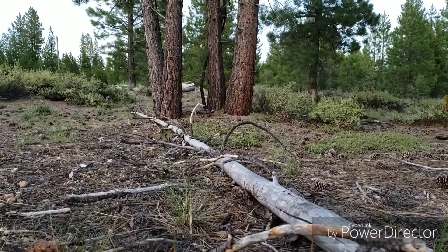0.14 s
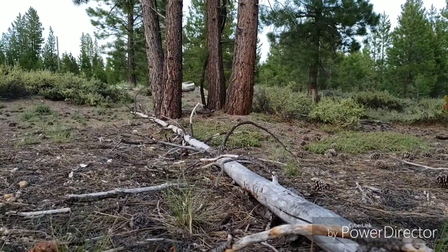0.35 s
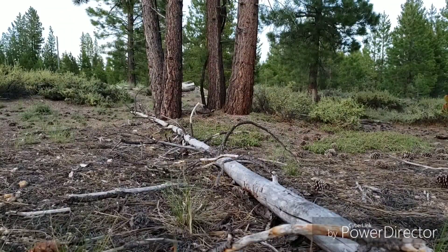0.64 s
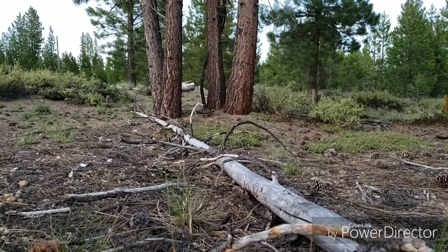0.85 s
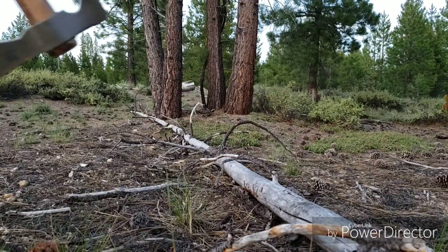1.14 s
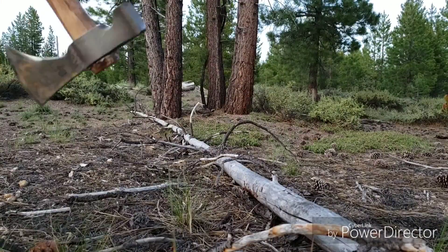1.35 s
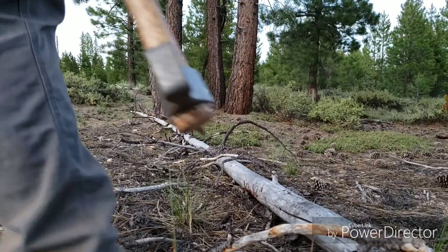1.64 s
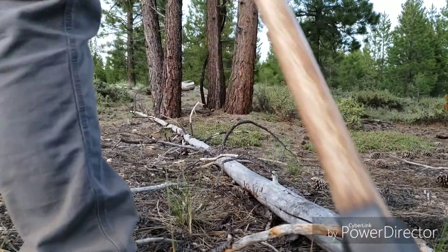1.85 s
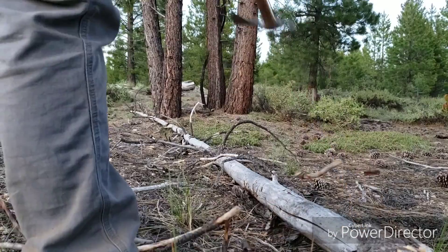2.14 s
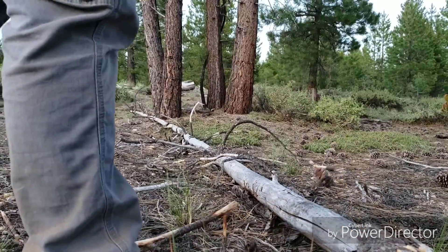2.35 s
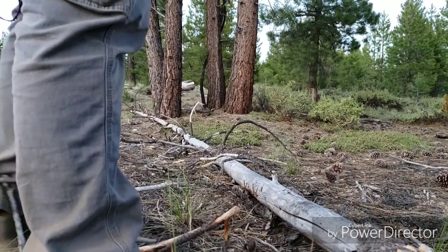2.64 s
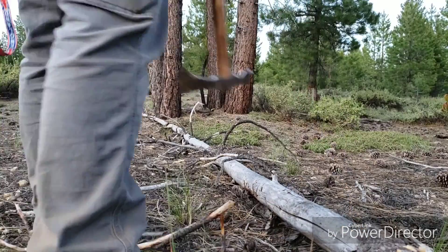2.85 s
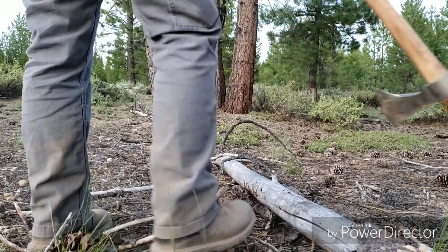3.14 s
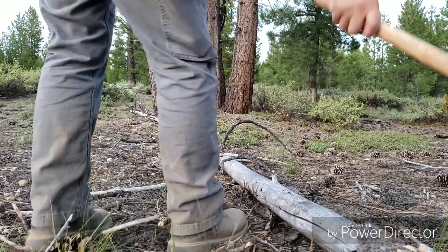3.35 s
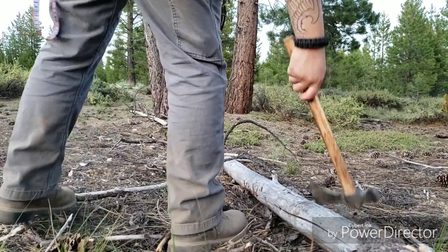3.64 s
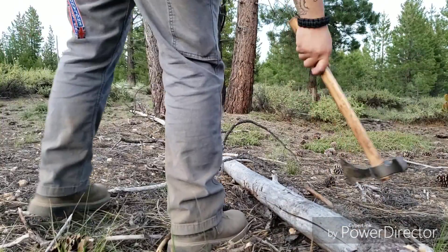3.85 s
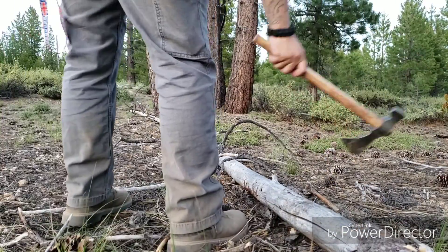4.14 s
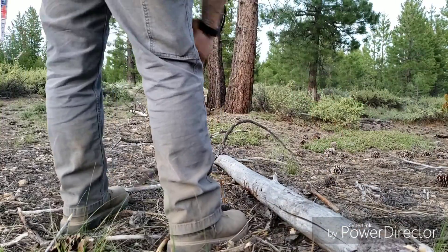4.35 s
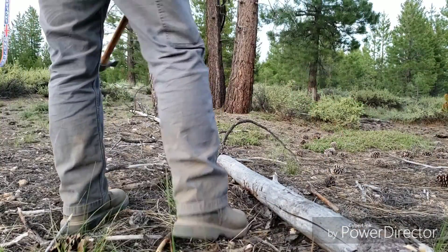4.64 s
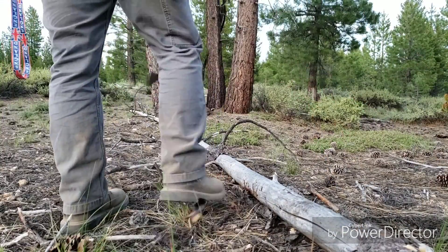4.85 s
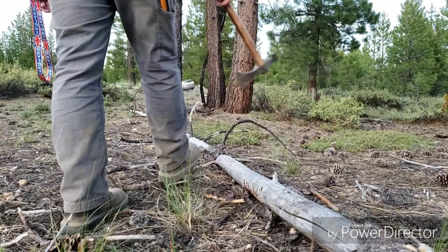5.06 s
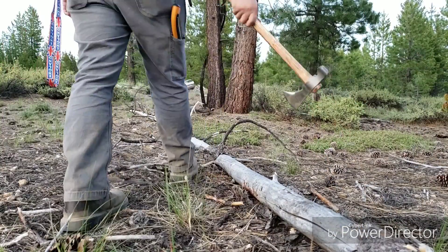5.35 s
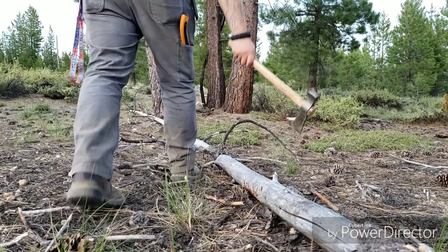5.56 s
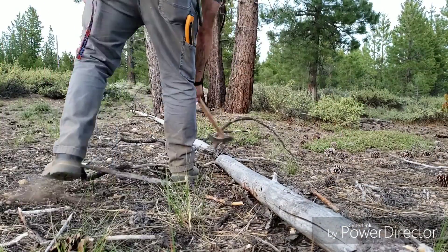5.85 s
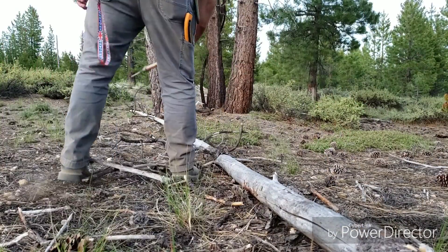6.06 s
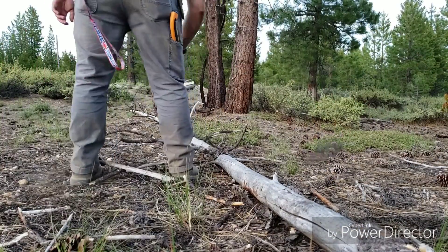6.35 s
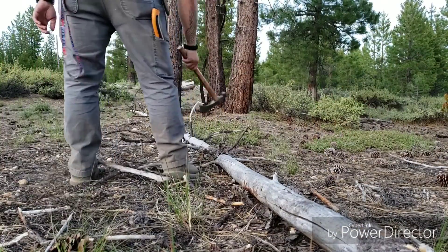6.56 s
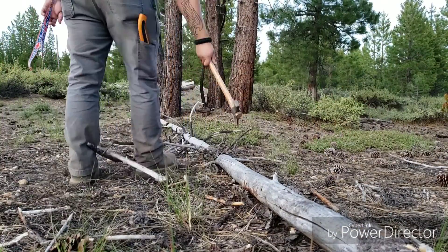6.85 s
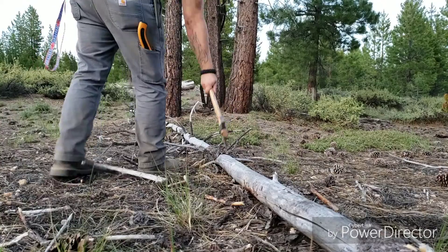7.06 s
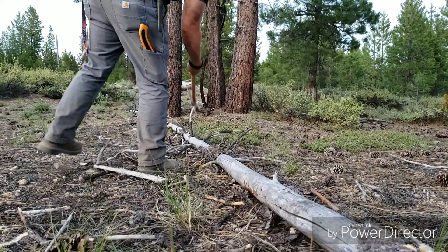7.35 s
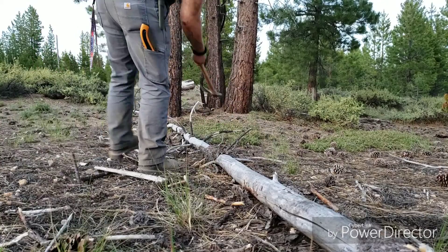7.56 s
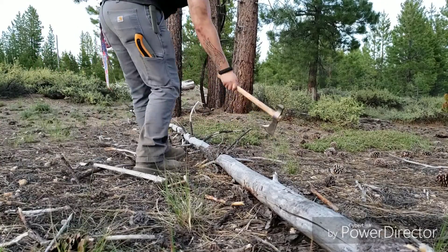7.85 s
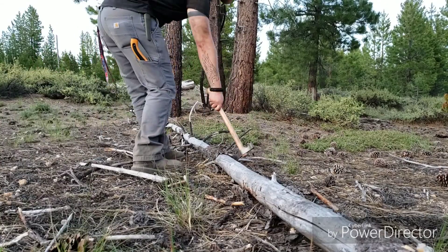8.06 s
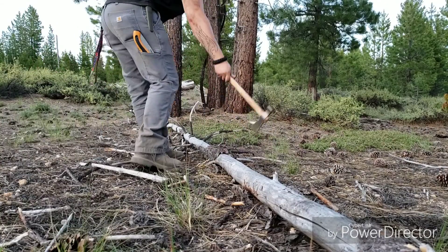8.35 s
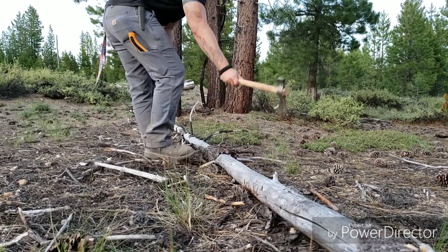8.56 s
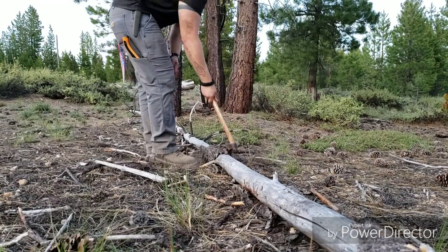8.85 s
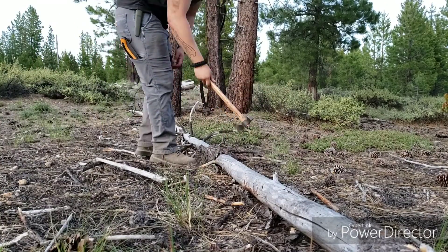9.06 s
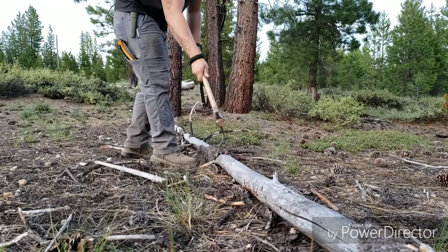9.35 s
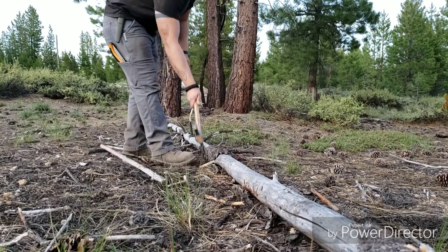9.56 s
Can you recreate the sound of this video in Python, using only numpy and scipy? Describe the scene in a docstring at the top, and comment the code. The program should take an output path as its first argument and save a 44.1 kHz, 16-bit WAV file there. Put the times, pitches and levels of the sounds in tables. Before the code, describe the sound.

Boots crunch through dry forest litter close on the left, then a hatchet chops a dead log in sharp, woody blows among snapping twigs.

```python
"""Boots crunch in dry forest litter first, close on the left of a phone's two microphone ports.
Then a hatchet trims a dead log: each blow is tearing noise, a thump through the log's resonances and
a ringing steel head, with chips pattering. Twigs snap as short noise bursts, dropped wood thuds as damped
sines, one squeak slides upward. Trunks return a faint tail of blows and snaps; gusts rumble on the ports."""
import sys
import numpy as np
from scipy import signal
from scipy.fft import rfft, irfft, next_fast_len
from scipy.io import wavfile
from scipy.ndimage import map_coordinates

SR = 44100
rng = np.random.default_rng(int(sys.argv[2]) if len(sys.argv) > 2 else 0)


def generate_wav(signal):
    """Clip the signal to [-1, 1] and save it as 16-bit WAV at the path in sys.argv[1]."""
    frames = np.transpose(np.atleast_2d(signal))
    scaled = np.clip(frames, -1, 1) * 32767
    pcm = np.round(scaled).astype(np.int16)
    wavfile.write(sys.argv[1], SR, pcm)


N = 427769  # samples
LEAD = 64  # samples of silence ahead of each short sound

# Steel head of the hatchet. Each row: pitch in Hz, level in dB on top of the blow's ring, 60 dB decay in s.
STEEL_MODES = [(5400, -4, .07), (6160, -2, .14), (12130, -5, .32)]
# Splitting wood at the ports. Each row: frequency in Hz, relative density in dB.
CRACK_SPECTRUM = [(710, -34), (1200, -15.5), (2220, -26), (4330, -14), (4780, -11), (6360, -7.5),
                  (7570, -19), (11000, -2.5), (14600, -9), (16500, -39.5)]
# Hatchet blows. Each row: strike in seconds, crack level in dB before a 5 dB trim, thump peak in dB,
# ground boom in dB relative to the thump, splintering in s, chips in dB relative to the crack,
# low ring in dB, high ring in dB, brushing ahead of the strike in s.
BLOWS = [(2.115, -9.5, -36.5, -19.5, 0.0049, -19, -50, -45, 0.0056),
         (3.6574, -7.5, -10, -20.5, 0.0053, -27, -48.5, -28.5, .018),
         (4.376, -12.5, -30, -11, 0.0055, -28.5, -54.5, -40, 0),
         (5.958, -8.5, -15.5, -21.5, 0.0051, -11.5, -25.5, -40.5, 0),
         (7.309, -6.5, -18.5, -30, 0.005, -25.5, -43.5, -46, 0.0001),
         (8.192, -25, -12.5, -16, 0.0044, -10, -51, -47, .01),
         (8.852, -10.5, -3, -29.5, 0.0053, -14.5, -51.5, -56, 0)]


def blows():
    """The edge tears fibres for some ms, thumps log and ground and rings the head; chips patter down."""
    out, t = np.zeros((2, N + SR)), np.arange(SR // 2) / SR
    patter = grit(count=600, spread_db=5, bed=1)
    for s, crack_db, thump_db, boom_db, tear_s, chips_db, low_db, high_db, brush_s in BLOWS:
        late = np.maximum(t - tear_s, 0)
        chips = amp(chips_db) * fade(late, .22) * np.resize(patter[round(s * SR):], len(t))
        opening = np.minimum(.3 + .7 * (t / tear_s) ** 2, 1)
        tearing = opening * (fade(late, .01) + chips)
        # thick wood splits duller than twigs: dB per octave
        fibres = filtered(noise(t), lambda hz: amp(-2.5 * np.log2(hz + 100)))
        crack = amp(crack_db - 5) * tearing * coloured(fibres, CRACK_SPECTRUM)

        impact = noise(t) * (fade(t, .028) + .16 * fade(t, .15))
        force = filtered(impact, lambda hz: 1 / (1 + 1j * hz / 1500))
        thump = filtered(force, wood)
        boom_shape = (1 - np.exp(-t / .0073)) * fade(t, .5)
        boom = amp(boom_db) * boom_shape * coloured(noise(t), RUMBLE_SPECTRUM)
        body = amp(thump_db) * (thump / np.abs(thump).max() + boom)

        ring = np.zeros(len(t))
        for (hz, mode_db, t60_s), struck_db in zip(STEEL_MODES, (low_db, high_db, high_db)):
            ring += amp(struck_db + mode_db) * fade(late, t60_s) * np.sin(2 * np.pi * hz * late)
        add(out, s, ports(lead(crack + body + ring), 3.07))

        # on its way down the head brushes through twigs and bark
        brush = amp(-33) * fade(t, .12) * (t < brush_s) * coloured(noise(t), CRACK_SPECTRUM)
        add(out, s - brush_s, ports(lead(brush), 2.2))
    return out[:, :N]


# The log's body. Each row: resonance in Hz, width in Hz, peak gain in dB.
LOG_MODES = [(76, 16, -15), (170, 38, -4), (259, 37, -3), (420, 100, -2.5), (600, 140, 0), (705, 650, -2.5),
             (1300, 1200, -19)]


def wood(hz):
    """Resonances of the log, each a band-pass peak with the sign alternating from mode to mode."""
    total = 0
    for k, (centre, width, db) in enumerate(LOG_MODES):
        damping = 1j * hz * width
        total = total + (-1) ** k * amp(db) * damping / (centre ** 2 - hz ** 2 + damping)
    return total


# The edge wrenched free. In order: start in seconds, length in s, first and last pitch in Hz before
# the wobble, level in dB before the wobble.
SQUEAK = (8.243, .04, 3900, 4500, -41)


def squeak():
    """Steel slips in the cut at a rising, unsteady rate, with a strong octave."""
    s, length, from_hz, to_hz, db = SQUEAK
    bend = ((np.arange(N) / SR - s) / length).clip(0, 1) ** 2
    rate_hz = (from_hz + (to_hz - from_hz) * bend) * (1 + .02 * wobble(400))
    phase = 2 * np.pi * np.cumsum(rate_hz) / SR
    tone = np.sin(phase) + .5 * np.sin(2 * phase)
    return ports(amp(db + 3 * wobble(300)) * np.sin(np.pi * bend) * tone, 3)


# Log and loose wood dropping back on the ground. Each row: start in seconds, envelope peak of the push
# in dB, pitch in Hz, loss in nepers per cycle.
THUDS = [(2.975, -28, 247, 3.4), (3.053, -34, 703, 0.48), (1.335, -36.5, 300, 2.1), (1.877, -28.5, 610, 3),
         (2.035, -32, 575, 3), (3.428, -28.5, 318, 7.8), (3.701, -7.5, 300, 6.4), (3.707, -12, 269, 2.9),
         (4.486, -32.5, 307, 7), (7.034, -47.5, 730, 0.3), (7.254, -50.5, 1185, .5),
         (8.446, -57, 613, 0.33), (8.905, -11.5, 308, 3.7), (8.985, -30, 487, 8.7),
         (8.99, -67.5, 602, .035), (9.672, -32.5, 353, 2.9)]


def thuds():
    """Wood lands as a damped sine: high loss leaves about one push, low loss rings for many cycles."""
    out, t = np.zeros((2, N + SR)), np.arange(SR // 3) / SR
    for s, db, hz, loss in THUDS:
        cycles = t * hz
        envelope = np.e * loss * cycles * np.exp(-loss * cycles)
        push = np.sin(2 * np.pi * cycles) * envelope
        add(out, s, ports(lead(amp(db) * (push + .12 * filtered(push, wood))), 16))
    return out[:, :N]


# Twigs snapping. Each row: snap in seconds, crack peak in dB before a 4 dB trim, knock in dB before
# a 0.5 dB trim and its own envelope.
SNAPS = [(0.7799, -28.5, -63), (0.7895, -32, -51), (2.145, -18, -40), (2.317, -27.5, -78),
         (2.3421, -24, -75), (2.384, -23.5, -70), (2.426, -25, -81), (2.7152, -12.5, -36),
         (2.899, -30.5, -62), (2.9424, -21, -48), (2.9683, -11.5, -46), (2.976, -12, -62),
         (3.022, -17, -57.5), (3.052, -22, -60), (3.2222, -17, -42.5), (3.276, -20, -50),
         (3.3111, 2.5, -36), (3.4288, -17.5, -33), (3.727, -24, -46), (4.4074, -11.5, -40),
         (4.4669, -15, -55), (4.4847, -14, -46.5), (4.911, -30.5, -66), (5.101, -26.5, -50),
         (5.56, -29, -47), (6.1556, -22.5, -75), (6.199, -28, -49), (6.22, -21, -67), (6.3894, -22.5, -82),
         (6.42, -38, -64), (6.5775, -19, -49), (6.7448, -26, -51.5), (6.8049, -13.5, -51),
         (6.8311, -21.5, -53), (6.8916, -4, -29), (6.93, -5.5, -32), (6.9497, -22.5, -47.5),
         (6.9819, -28, -48), (6.9926, -18, -48), (7.031, -17.5, -47), (7.0367, -16.5, -46.5),
         (7.1608, -11.5, -43.5), (7.9492, -37, -50), (7.9665, -20, -35), (8.233, -34.5, -56.5),
         (8.297, -26, -53.5), (8.353, -18.5, -59), (8.77, -20.5, -51.5), (8.788, -10.5, -36),
         (9.651, -20.5, -57), (9.6752, -14.5, -42)]


def snaps():
    """Each twig creaks up to a very short bright crack and gives a dull knock."""
    out, t = np.zeros((2, N + SR)), np.arange(SR // 8) / SR
    tilt_db, = curves(WALKER_PLACE)
    bend_s = .004  # creak before the break
    late = np.maximum(t - bend_s, 0)
    rise = amp(60 * (t - bend_s) / .003)
    shape = np.minimum(rise, fade(late, .011) + .06 * fade(late, .05))
    for s, crack_db, knock_db in SNAPS:
        thin_db = rng.normal(0, 2)  # thinner twigs snap brighter: dB per octave
        fibres = filtered(noise(t), lambda hz: amp(thin_db * np.log2((hz + 100) / 8000)))
        crack = shape * coloured(fibres, CRACK_SPECTRUM)
        crack = amp(crack_db - 4) * crack / np.abs(crack).max()
        knock_shape = t / .0027 * fade(t, .03)
        knock = amp(knock_db - .5) * knock_shape * coloured(noise(t), TREAD_SPECTRUM)
        add(out, s + .001 - bend_s, ports(lead(crack + knock), tilt_db[round(s * SR)]))
    return out[:, :N]


# Crackle as the ports colour it. Each row: frequency in Hz, relative density in dB.
CRACKLE_SPECTRUM = [(710, -51.5), (1200, -15.5), (2220, -32), (2890, -19.5), (3840, -16), (4940, -16),
                    (6290, -14.5), (7740, -30.5), (8830, -17.5), (11700, 0), (14800, -13.5), (16000, -26),
                    (16500, -62.5)]
# Tread on soft ground. Each row: frequency in Hz, relative density in dB.
TREAD_SPECTRUM = [(53, -27), (90, -14.5), (119, -7.5), (452, -9.5), (505, -11.5), (695, -13), (1070, -15.5),
                  (2500, -29), (3250, -43.5), (5500, -120)]
# Where the walker is. Each row: time in seconds, treble tilt toward the left port in dB.
WALKER_PLACE = [(0, 15.5), (.4, 18), (1.85, 16), (2.1, 8.5), (2.5, 6.5), (2.65, 14), (3.08, 12.5),
                (3.16, 6.5), (3.75, 2), (4.05, 11), (5.3, 14), (6, 3), (6.3, 11), (8.4, 4), (9.7, 7)]
# Footfalls, scuffs and jolts of the log. Each row: start in seconds, length in s, crunch level in dB,
# tread level in dB.
STIRS = [(0, 0.18, -43.5, -48.5), (.365, 0.86, -51, -63), (.76, 0.14, -39.5, -50), (.85, .15, -47, -49.5),
         (1.11, 0.2, -49, -60.5), (1.32, 0.12, -48, -51), (1.47, 0.056, -47, -56.5),
         (1.62, 0.12, -60.5, -71.5), (1.76, 0.099, -41.5, -50), (1.87, 0.17, -43, -47),
         (2.12, 0.028, -50.5, -60), (2.35, 0.013, -54, -70), (2.46, 0.0057, -51.5, -97),
         (2.61, 0.07, -53.5, -62), (2.77, 0.14, -47, -63), (2.97, 0.14, -47.5, -56.5),
         (3.24, 0.087, -44.5, -59), (3.32, 0.039, -42.5, -49.5), (3.43, 0.013, -46, -47.5),
         (3.55, 0.095, -61.5, -74), (3.67, 0.0097, -36.5, -36), (3.91, 0.0091, -57, -93),
         (4.07, 0.024, -63, -73), (4.39, 0.089, -50, -49.5), (4.68, 0.09, -62, -73),
         (4.94, 0.034, -50.5, -74.5), (5.11, 0.023, -57, -73.5), (5.28, 0.14, -63.5, -83),
         (5.43, 0.0075, -45, -64.5), (5.56, 0.012, -50, -58), (5.73, 0.0083, -56, -68.5),
         (5.905, 0.16, -55, -67), (6.2, 0.0073, -50, -52.5), (6.35, 0.11, -62, -64.5),
         (6.6, 0.92, -61, -71.5), (6.8, 0.11, -57, -58.5), (6.91, 0.14, -59.5, -55.5),
         (7.15, 0.15, -67, -70.5), (7.31, 0.016, -48, -53), (7.45, 0.077, -60, -101),
         (7.78, 0.21, -137, -77.5), (7.9, 0.13, -58.5, -64.5), (8.215, 0.051, -41, -46),
         (8.585, 0.36, -52.5, -71), (8.81, 0.021, -47, -51), (8.875, 0.038, -47, -47),
         (9.1, 0.13, -67, -66.5), (9.24, 0.019, -84, -58.5), (9.53, 0.2, -66, -79)]
CRUNCH_FADE_DB_PER_S, TREAD_FADE_DB_PER_S = 174.5, 203  # after each stir
STILL_CRUNCH_DB, STILL_TREAD_DB = -72.5, -81.5  # the forest floor at rest


def litter():
    """Needles and cones break in dense spiky grains; the same steps push the soft ground and shake it."""
    crunch_gain = amp(STILL_CRUNCH_DB) + swells(STIRS, column=2, fade_db_per_s=CRUNCH_FADE_DB_PER_S)
    tread_gain = amp(STILL_TREAD_DB) + swells(STIRS, column=3, fade_db_per_s=TREAD_FADE_DB_PER_S)
    flutter = amp(1.5 * wobble(25) + 1.5 * wobble(90))
    grains = unit(flutter * grit(count=500, spread_db=5.5, bed=1.3))
    # grains lie spread out, so each port also hears its own share
    crunch = grains * (.3 * rng.standard_normal(N) + rng.standard_normal((2, N)))
    lumps = amp(3.4 * wobble(30) + 2.5 * wobble(120))
    steps = lumps * (rng.standard_normal(N) + .4 * rng.standard_normal((2, N)))
    shake = amp(-7.5) * coloured(rng.standard_normal(N), RUMBLE_SPECTRUM)
    tread = tread_gain * (coloured(steps, TREAD_SPECTRUM) + shake)
    # the walker moves between a place close at the left, all fizz, and a fuller one straight ahead
    left = np.clip((curves(WALKER_PLACE)[0] - 3) / 13, 0, 1)
    near = crunch_gain * coloured(crunch, CRACKLE_SPECTRUM) + tread
    ahead = crunch_gain * coloured(crunch, CRACK_SPECTRUM) + tread
    return ports(near * np.sqrt(left), 17.91) + ports(ahead * np.sqrt(1 - left), 3.3)


# Scattering between the trees. Each row: frequency in Hz, 60 dB decay in s.
TRUNK_DECAY = [(100, 0.38), (400, 0.1), (3000, 0.22), (12000, 0.028)]


def trunks(x):
    """Trees and ground scatter a sound back as decaying noise; every frequency dies at its own speed."""
    hz, t, grid = signal.stft(rng.standard_normal((2, SR // 2)), SR, nperseg=256)
    decay = fade(t, along(TRUNK_DECAY, hz)[:, None])
    tail = signal.istft(grid * decay, SR, nperseg=256)[1]
    delayed = np.pad(x, ((0, 0), (300, 0)))  # samples
    return signal.fftconvolve(delayed, tail / np.linalg.norm(tail[0]), axes=1)[:, :N]


# Low rumble of wind and ground. Each row: frequency in Hz, relative density in dB.
RUMBLE_SPECTRUM = [(12, -47.5), (20, -6), (42, 1), (59, 5), (78, -0.5), (160, -19.5), (210, -43.5),
                   (350, -120)]
# Gusts on the ports. Each row: start in seconds, length in s, level in dB.
GUSTS = [(0, 0.23, -47.5), (.45, 0.076, -33.5), (.55, 0.11, -41), (.73, .12, -43), (.925, 0.01, -31.5),
         (1.42, 0.15, -62), (2.97, .05, -46), (3.39, .06, -50.5), (9.0, 0.055, -46.5)]
GUST_FADE_DB_PER_S = 257.5


def wind():
    """Short gusts rumble in lumps, partly different on each port."""
    lumps = amp(3.2 * np.array([wobble(23.45), wobble(14.0)]))
    a, b = lumps * rng.standard_normal((2, N))
    gain = swells(GUSTS, column=2, fade_db_per_s=GUST_FADE_DB_PER_S)
    return gain * coloured(np.array([a + 2.2 * b, a - .23 * b]), RUMBLE_SPECTRUM)


# Shading between the two ports. Each row: frequency in Hz, share of the left-right tilt.
PORT_SHADE = [(100, 0.38), (1200, 0.074), (3000, 0.05), (8000, 0.82), (15000, 0.98)]


def ports(x, tilt_db):
    """Tilt brightens the left port, early above 10 dB and late below.

    Each sound reaches the two ports with its own random treble phase."""
    side = np.array([[.5], [-.5]])  # left, right
    lag_s = (22 - 2.2 * tilt_db) / SR  # left behind right
    knots = rng.standard_normal((2, 25))

    def response(hz):
        random_phase = np.array([np.interp(hz, np.linspace(0, SR / 2, k.size), k) for k in knots])
        turn = 1.5 * random_phase * hz ** 2 / (hz ** 2 + 2500 ** 2) - 2 * np.pi * hz * side * lag_s
        bass_db = 5 / (1 + (hz / 2500) ** 2)  # fuller on the right
        return amp(side * (along(PORT_SHADE, hz) * tilt_db - bass_db)) * np.exp(1j * turn)
    return filtered(x, response)


RISE_DB_PER_S, SAG_DB_PER_S = 800, 15  # before each row's start, and while it lasts


def swells(rows, column, fade_db_per_s):
    """Gain over time: each row rises fast, sags while it lasts and fades; their powers add."""
    t = np.arange(0, N + 64, 64) / SR
    s, length, db = (np.array(rows)[:, k, None] for k in (0, 1, column))
    rise = RISE_DB_PER_S * (s - t).clip(0)
    sag = SAG_DB_PER_S * (t - s).clip(0, length)
    fall = fade_db_per_s * (t - s - length).clip(0)
    return np.interp(np.arange(N) / SR, t, np.linalg.norm(amp(db - rise - sag - fall), axis=0))


def grit(count, spread_db, bed):
    """An envelope of rms 1: about count spiky grains a second on a steady bed."""
    spikes = (rng.random(N) < count / SR) * amp(spread_db * rng.standard_normal(N))
    grains = signal.fftconvolve(spikes, fade(np.arange(300) / SR, .004))[:N]
    return unit(bed + unit(grains))


def amp(db):
    """Amplitude of a level in dB."""
    return 10 ** (np.asarray(db) / 20)


def fade(t, t60_s):
    """Exponential decay by 60 dB in t60_s."""
    return amp(-60 * t / t60_s)


def noise(t):
    """White noise as long as t."""
    return rng.standard_normal(len(t))


def unit(x):
    """x scaled to rms 1."""
    return x / np.sqrt(np.mean(x ** 2) + 1e-20)


def along(points, hz):
    """(Hz, value) points read on a log frequency axis."""
    f, v = np.transpose(points)
    return np.interp(np.log(hz + 1), np.log(f + 1), v)


def curves(rows):
    """One value per sample for each column after the time."""
    s, *cols = np.transpose(rows)
    return [np.interp(np.arange(N) / SR, s, c) for c in cols]


def wobble(rate):
    """A smooth random curve, rate knots a second."""
    knots = rng.standard_normal(int(N * rate / SR) + 4)
    return map_coordinates(knots, [np.arange(N) * rate / SR])


def filtered(x, response):
    """x times a complex response of frequency."""
    m = next_fast_len(x.shape[-1] + 4096)
    return irfft(rfft(x, m) * response(np.fft.rfftfreq(m, 1 / SR)), m)[..., :x.shape[-1]]


def coloured(x, spectrum):
    """x shaped by a spectrum table, at rms 1."""
    return unit(filtered(x, lambda hz: amp(along(spectrum, hz))))


def lead(x):
    """Silence ahead of x, so that a port may hear it early."""
    return np.pad(x, (LEAD, 0))


def add(out, s, pair):
    """Mix a short stereo sound, which carries its lead, in at time s."""
    k = round(s * SR) - LEAD
    out[:, k:k + pair.shape[1]] += pair


def scene():
    """Hatchet work and twigs with their scattered tail, over the litter and the wind."""
    chops = blows() + thuds() + squeak()
    twigs = snaps()
    scattered = trunks(amp(-18.5) * chops + amp(-15.5) * twigs)
    return chops + twigs + scattered + litter() + wind()


def record(dry):
    """The phone thins the deepest bass and keeps nothing above its band limit."""
    thinned = filtered(dry, lambda hz: (1j * hz / (40 + 1j * hz)) ** 2)
    return filtered(thinned, lambda hz: hz < 16800)


dry = scene()
out = record(dry)
generate_wav(out)
```